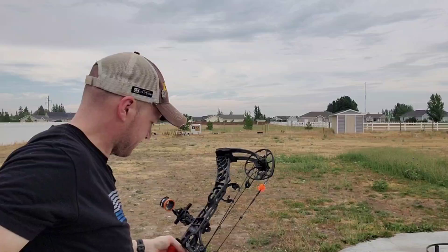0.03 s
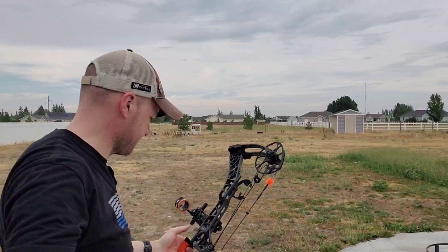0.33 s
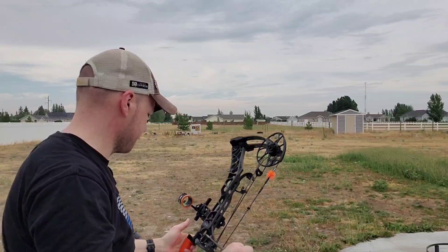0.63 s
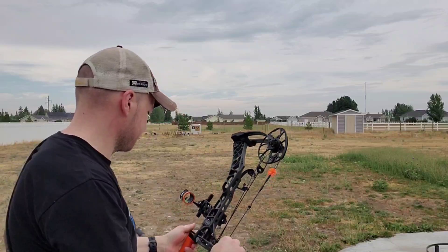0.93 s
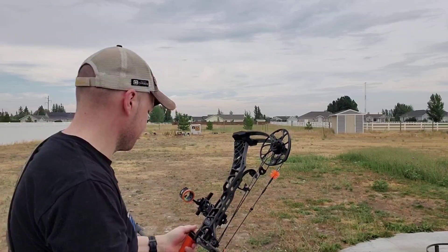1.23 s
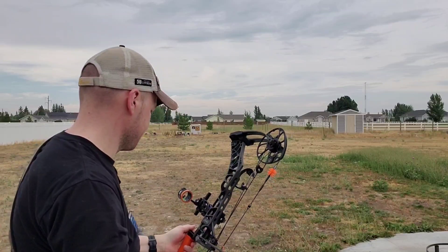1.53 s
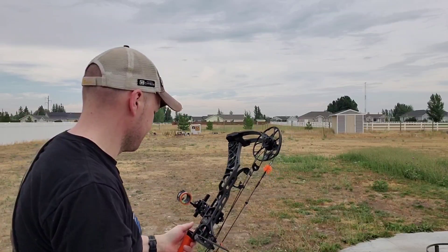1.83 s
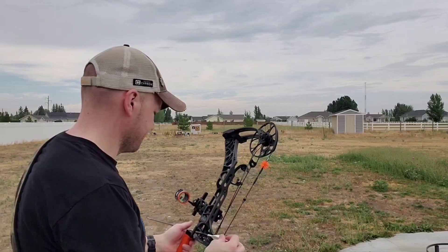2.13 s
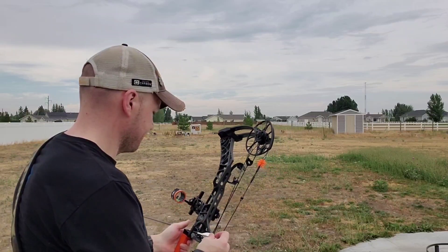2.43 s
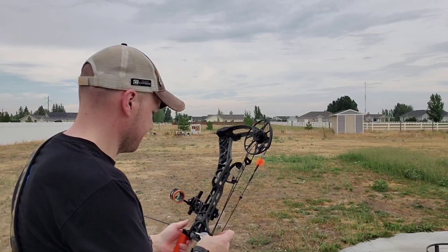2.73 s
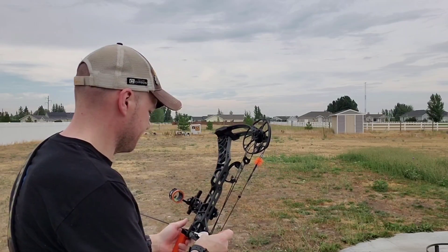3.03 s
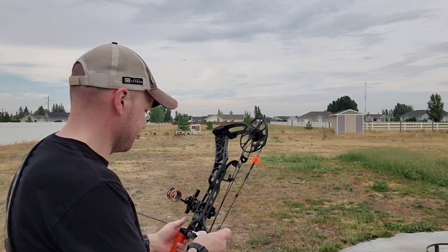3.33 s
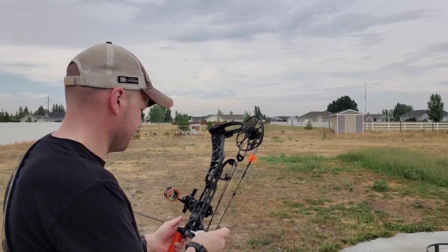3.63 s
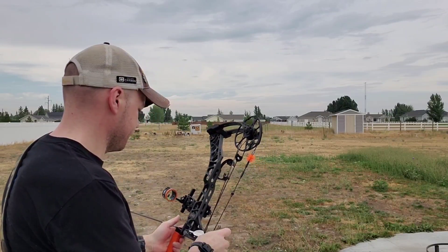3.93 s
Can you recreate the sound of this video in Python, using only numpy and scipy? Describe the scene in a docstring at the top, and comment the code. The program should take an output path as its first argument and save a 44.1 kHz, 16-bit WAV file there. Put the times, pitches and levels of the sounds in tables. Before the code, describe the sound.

About a metre from the microphone, beside an open field, a bow knocks and rattles lightly. An arrow is pulled free with a snap and scrape, and finally clicks onto the string, over faint wind rumble and a far engine.

```python
"""Beside an open field, a compound bow is readied about a metre from the microphone.
A hand knocks on the bow and a loose fitting tinkles. An arrow snaps out of the quiver, rasps through
its grip and brushes the rest in tiny stick-slips; then its nock clicks onto the string.
Each contact is a short crunch with ringing modes and a rattle. Behind it all: faint wind rumble,
far traffic, the drone of a distant engine and one thin whistle."""
import sys
import numpy as np
from scipy import signal
from scipy.fft import rfft, irfft
from scipy.io import wavfile
from scipy.ndimage import uniform_filter1d

SR = 44100
rng = np.random.default_rng(int(sys.argv[2]) if len(sys.argv) > 2 else 0)


def wrap_up_sound(samples):
    """Save the sound to the file named by the first command line argument, as 16-bit audio."""
    columns = np.atleast_2d(samples).T
    # keep every value between -1 and 1, then stretch to whole-number steps
    tamed = np.clip(columns, -1, 1)
    steps = np.round(tamed * 32767).astype(np.int16)
    wavfile.write(sys.argv[1], SR, steps)


N = 176400
TIME_S = np.arange(N) / SR
HIT_GAIN = np.sqrt(.004 * SR)  # gives a hit of energy 1 the energy of 4 ms at rms 1


def undb(db):
    """Decibels to gain."""
    return 10 ** (np.asarray(db) / 20)


def unit(x):
    """Scale to rms 1."""
    return x / np.sqrt(np.mean(x ** 2))


def energy(x):
    """Scale to energy 1 in each channel."""
    return x / np.sqrt(np.sum(x ** 2, axis=-1, keepdims=True))


def pan(x, left_db):
    """Make the left louder than the right."""
    return x * undb(np.array([[left_db], [-left_db]]) / 2)


def lag_right(x, lag_s):
    """Let a sound reach the right microphone later."""
    shift = np.exp(-2j * np.pi * np.arange(N // 2 + 1) * SR / N * lag_s)
    return np.array([x[0], irfft(rfft(x[1]) * shift, N)])


def colour(x, points, tilt_db=0, size=1024):
    """Causal EQ through (freq_hz, gain_db) points, tilted by tilt_db per octave above 1 kHz."""
    hz, db = np.array(points).T
    octave = np.log2(np.maximum(np.arange(size // 2 + 1), .5) * SR / size)
    curve_db = np.interp(octave, np.log2(hz), db) + tilt_db * np.maximum(octave - 10, 0)
    cepstrum = irfft(np.log(undb(curve_db)))
    cepstrum[1:size // 2] *= 2  # fold to minimum phase
    cepstrum[size // 2 + 1:] = 0
    impulse = irfft(np.exp(rfft(cepstrum)))
    return signal.fftconvolve(x, impulse[None], axes=1)[:, :x.shape[1]]


def drift(rate_hz):
    """Smooth random drift, spread near 1."""
    hold = int(SR / rate_hz)
    steps = np.repeat(rng.standard_normal(N // hold + 2), hold)
    return unit(uniform_filter1d(uniform_filter1d(steps, hold), hold))[:N]


def noise(side_db, size=N):
    """Stereo noise, wider as side_db rises."""
    mid, side = rng.standard_normal((2, size))
    return unit(mid + undb(side_db) * side * np.array([[1], [-1]]))


def fader(points):
    """Gain through (time_s, level_db) points, silent outside them."""
    return undb(np.interp(TIME_S, *np.array(points).T, left=-140, right=-140))


def add(out, start_s, x):
    """Mix a sound in at a time."""
    i = int(start_s * SR)
    out[:, i:i + x.shape[1]] += x[:, :N - i]


# Low rumble of the wind: freq_hz, gain_db
WIND_EQ = [(20, -19.5), (35, -14), (50, -5.5), (66, 1), (95, 5.5), (115, -4.5), (165, -10), (225, -7.5),
           (270, -20), (400, -34), (900, -62)]
def wind(level_db=-51):
    """Faint wind rumble, gently wavering."""
    rumble = unit(colour(noise(side_db=-13.5), WIND_EQ, size=8192))
    return pan(rumble * undb(level_db + .84 * drift(4.94)), left_db=1.3)


# Midrange wash of the traffic: freq_hz, gain_db
TRAFFIC_EQ = [(100, -2), (280, -1), (400, -3), (800, 3.5), (1100, 2), (1600, -7), (2300, -22), (4000, -27),
              (6500, -39), (9500, -36), (13000, -29.5), (15500, -33.5)]
def traffic(level_db=-62.5):
    """Far traffic lies to the left, so it reaches the right microphone later."""
    wash = unit(colour(lag_right(noise(side_db=-5), .00039), TRAFFIC_EQ, size=2048))
    return pan(wash * undb(level_db + .6 * drift(3)), left_db=4.4)


# Fader points of the engine: time_s
ENGINE_TIMES = [0, .9, 1.6, 2.0, 2.4, 3.1, 3.9]
# Tones of the engine: pitch_hz, level_db at each fader point
ENGINE_TONES = [(67.5, [-50, -62, -51.5, -52, -51, -52.5, -68]),
                (127.2, [-46.5, -52.5, -54.5, -53.5, -71, -73.5, -63.5]),
                (201, [-58.5, -77, -63, -60, -64, -67, -84.5]), (231, [-58, -63, -66, -82, -78, -57, -76])]
def engine():
    """Low wavering tones of a far engine, each swelling and fading."""
    drone = 0
    for pitch_hz, levels_db in ENGINE_TONES:
        phase = 2 * np.pi * np.cumsum(pitch_hz * (1 + .00564 * drift(4))) / SR
        swell_db = np.interp(TIME_S, ENGINE_TIMES, levels_db) + 2.44 * drift(7.85)
        drone += unit(np.sin(phase)) * undb(swell_db)
    return pan(drone, left_db=1.6)


# Glide of the whistle: time_s, pitch_hz, level_db
WHISTLE_GLIDE = [(0.335, 7800, -94), (0.355, 7660, -82), (0.385, 7560, -79), (0.42, 7900, -84),
                 (0.46, 8250, -92)]
def whistle():
    """One thin note far off, perhaps a bird, that dips and rises."""
    time_s, pitch_hz, level_db = np.array(WHISTLE_GLIDE).T
    glide_hz = np.interp(TIME_S, time_s, pitch_hz) * (1 + .0022 * drift(200))
    phase = 2 * np.pi * np.cumsum(glide_hz) / SR
    return unit(np.sin(phase)) * fader(np.column_stack([time_s, level_db]))


# Tone of the reflections: freq_hz, gain_db
SCATTER_EQ = [(200, 0), (3000, -13), (9000, -10), (15000, -4)]
def reflections(x, level_db=-17, t60_s=.48, size=26000):
    """Soft scatter from the ground and nearby walls."""
    t = np.arange(size) / SR
    tail = rng.standard_normal((2, size)) * undb(-60 * t / t60_s) * (1 - np.exp(-t / .008))
    tail = energy(colour(tail, SCATTER_EQ))
    return undb(level_db) * signal.fftconvolve(x, tail, axes=1)[:, :N]


# Swell of the sleeve against the body: time_s, level_db
SLEEVE_SWELL = [(0, -68), (.05, -68.5), (.1, -63.5), (.16, -55), (.22, -68), (.27, -69), (.33, -74.5),
                (.44, -73), (.56, -102)]
# Tone of the cloth: freq_hz, gain_db
SLEEVE_EQ = [(400, -11), (1500, 15.5), (3000, 0), (5500, -4), (8500, -2.5), (11500, -7), (15500, -7)]
def sleeve():
    """Soft cloth rustle as the arm comes round to the bow."""
    folds = undb(1.8 * drift(300))
    return unit(colour(noise(side_db=-1) * folds, SLEEVE_EQ)) * fader(SLEEVE_SWELL)


# Tone of the arrow shaft, rubbed or tapped: freq_hz, gain_db
SHAFT_EQ = [(300, -12), (900, -12.5), (1600, -5.5), (2900, 0), (4500, -7.5), (8000, -12.5), (11000, -16),
            (15500, -14)]
def stick_slip(resonances, slips_per_s, scatter_db, ring_db, tilt_db, judder_db, wander_db):
    """Tiny uneven slips and fine hiss excite the shaft; its resonances swell and fade as it slides."""
    slipping = rng.random(N) < slips_per_s / SR
    strength = undb(scatter_db * np.clip(rng.standard_normal(N), -2, 2))
    slips = unit(slipping * strength * rng.choice([-1, 1], N))
    force = (slips + noise(side_db=0)) * undb(judder_db * drift(220))
    body = 0
    for pitch_hz, width_hz, gain_db in resonances:
        band = signal.lfilter(*signal.iirpeak(pitch_hz, pitch_hz / width_hz, SR), force)
        body += band * undb(gain_db + ring_db + wander_db * drift(44.68))
    return unit(colour(force, SHAFT_EQ, tilt_db) + body)


# Swell of the brush: time_s, level_db
BRUSH_SWELL = [(1.89, -84), (1.955, -75.5), (2.0, -60.5), (2.04, -63), (2.058, -69.5), (2.11, -83)]
# Resonances of the shaft on the rest: pitch_hz, width_hz, gain_db
BRUSH_RESONANCES = [(2950, 200, -2), (3650, 260, 1), (4400, 280, 4), (5050, 200, -5), (8100, 700, -14)]
def rest_brush():
    """The shaft slides lightly over the arrow rest with a flickering hiss."""
    hiss = stick_slip(BRUSH_RESONANCES, slips_per_s=6500, scatter_db=5.5,
                      ring_db=2, tilt_db=-1.5, judder_db=.2, wander_db=7.5)
    return hiss * fader(BRUSH_SWELL)


# Swell of the rasp: time_s, level_db
RASP_SWELL = [(1.304, -58), (1.314, -47), (1.335, -43.5), (1.362, -49.5), (1.396, -49), (1.413, -46),
              (1.436, -49), (1.455, -52.5), (1.47, -52), (1.49, -52.5), (1.503, -66.5), (1.54, -70),
              (1.585, -101)]
# Resonances of the shaft in the grip: pitch_hz, width_hz, gain_db
RASP_RESONANCES = [(2070, 63, -5), (2216, 160, -2.5), (2900, 79, 3), (3600, 350, -2), (4320, 150, -4.5),
                   (5180, 100, -9), (6400, 500, -13.5), (8670, 250, -10)]
def quiver_rasp():
    """The shaft drags through the quiver's grip."""
    rasp = stick_slip(RASP_RESONANCES, slips_per_s=1500, scatter_db=1.5,
                      ring_db=2.5, tilt_db=.5, judder_db=.54, wander_db=1.5)
    return rasp * fader(RASP_SWELL)


def ringing(modes, size=8192):
    """Decaying modes of a struck part, slightly out of phase between left and right."""
    t, ring = np.arange(size) / SR, 0
    for pitch_hz, gain_db, t60_s in modes:
        cycles = pitch_hz * t + rng.random() + rng.random((2, 1)) / 6
        ring += undb(gain_db - 60 * t / t60_s) * np.sin(2 * np.pi * cycles) / np.sqrt(t60_s)
    return energy(ring)


def hit(eq, modes, contact_s, tilt_db, crack_db, ring_db, rattle_db, rattle_s, size=8192):
    """One contact: a short crunch, with a crack, a ring and a fading rattle mixed relative to it."""
    t = np.arange(size) / SR
    envelope = np.exp(-t / contact_s) * (1 - np.exp(-4 * t / contact_s))
    crunch = energy(noise(side_db=-7.5, size=size) * envelope)
    crack = undb(crack_db) * (t == 0)
    rattle = undb(rattle_db) * energy(noise(side_db=.5, size=size) * np.exp(-t / rattle_s))
    sound = energy(colour(crunch + crack + rattle, eq)) + undb(ring_db) * ringing(modes, size)
    return energy(colour(sound, [(20, 0), (20000, 0)], tilt_db)) * HIT_GAIN


# Knocks on the bow: start_s, level_db, contact_s, tilt_db_per_octave
BOW_KNOCKS = [(0.0461, -51.5, 0.0054, -9), (0.1204, -44.5, 0.0013, -1.5), (0.1446, -41.5, 0.008, -6),
              (0.1495, -46.5, 0.0049, -1), (0.1714, -43, 0.0056, -1.5), (0.1743, -37.5, 0.0093, 0.5),
              (0.1804, -40.5, 0.001, 4.5), (0.19, -50, 0.0024, 3), (0.2171, -50.5, 0.0014, -4.5),
              (0.2881, -53.5, 0.0024, -1), (0.333, -61, 0.0036, -3.5), (0.392, -51, 0.0071, -4.5),
              (0.402, -53.5, 0.0046, -6)]
# Tone of a knock: freq_hz, gain_db
KNOCK_EQ = [(120, 3), (300, 5), (700, 5.5), (1100, 2), (1550, 5.5), (2800, -7), (4400, -4), (7000, -9),
            (11000, -17.5), (15500, -18)]
# Ring of the bow: pitch_hz, gain_db, t60_s
BOW_MODES = [(295, 0, .12), (850, -3, .04), (1480, -3, .035), (2300, -7, .025), (3700, -5, .03),
             (4450, -3, .035), (6950, -3, .02), (9150, -3, .025)]
def bow_knocks():
    """Hand and fittings knock on the bow and set it ringing."""
    out = np.zeros((2, N))
    for start_s, level_db, contact_s, tilt_db in BOW_KNOCKS:
        knock = hit(KNOCK_EQ, BOW_MODES, contact_s, tilt_db,
                    crack_db=-14, ring_db=-6, rattle_db=-5, rattle_s=.012)
        add(out, start_s, undb(level_db) * knock)
    return out


# Bounces of the fitting: start_s, level_db
FITTING_BOUNCES = [(0.1825, -44), (0.2015, -55), (0.2315, -60)]
# Ring of the fitting: pitch_hz, gain_db, t60_s
FITTING_MODES = [(4400, 0, .045), (4620, -1, .05), (3720, -8, .035)]
def fitting_tinkles():
    """A loose metal fitting rings in fading bounces after the hardest knock."""
    out = np.zeros((2, N))
    for start_s, level_db in FITTING_BOUNCES:
        add(out, start_s, undb(level_db) * ringing(FITTING_MODES) * HIT_GAIN)
    return out


# Taps of the shaft: start_s, level_db
SHAFT_TAPS = [(1.1676, -65.5), (1.681, -69), (1.903, -63.5), (1.913, -62.5), (2.036, -60), (3.6354, -71)]
def shaft_taps():
    """Light, dull taps of the shaft ring the bow."""
    out = np.zeros((2, N))
    for start_s, level_db in SHAFT_TAPS:
        tap = hit(SHAFT_EQ, BOW_MODES, contact_s=.0032, tilt_db=-5.5,
                  crack_db=-10, ring_db=-6, rattle_db=-3, rattle_s=.01)
        add(out, start_s, undb(level_db) * tap)
    return out


# Snaps of the quiver: start_s, level_db, tilt_db_per_octave
QUIVER_SNAPS = [(1.305, -35, -1.5), (1.3093, -47, -3), (1.3174, -43, -6), (1.3221, -45, 1),
                (1.3305, -48, -4), (1.3383, -56, -1), (1.402, -49, -7), (1.407, -52, -4.5),
                (1.4153, -45.5, -3), (1.43, -50, -4), (1.4821, -49.5, -3.5)]
# Tone of a snap: freq_hz, gain_db
SNAP_EQ = [(300, -24), (700, -16), (1200, -10.5), (1900, -13), (3000, -0.5), (5500, -2), (8000, 1),
           (12000, -2), (15500, -4)]
# Ring of the quiver: pitch_hz, gain_db, t60_s
QUIVER_MODES = [(2980, -1, .1), (4530, -9.5, 0.039), (6840, 1.5, 0.029), (8000, -1, 0.016),
                (9800, -1.5, 0.015), (11250, -10, 0.022)]
def quiver_snaps():
    """The arrow snaps free of the quiver and catches as it slides."""
    out = np.zeros((2, N))
    for start_s, level_db, tilt_db in QUIVER_SNAPS:
        snap = hit(SNAP_EQ, QUIVER_MODES, contact_s=.0009, tilt_db=tilt_db,
                   crack_db=-2, ring_db=-5, rattle_db=-3, rattle_s=.007)
        add(out, start_s, undb(level_db) * snap)
    return out


# The nock's click and its bounces: start_s, level_db
NOCK_CLICKS = [(3.9107, -44.5), (3.9154, -45), (3.9208, -45)]
# Tone of a click: freq_hz, gain_db
NOCK_EQ = [(300, -10), (850, -1), (2000, -4), (2800, -1.5), (3600, 0.5), (5200, -1.5), (6600, -0.5),
           (9500, 0), (13500, -7), (15500, -7)]
# Ring of the nock: pitch_hz, gain_db, t60_s
NOCK_MODES = [(860, -9, .06), (3461, 2, .09), (6455, -4, .06), (8640, 0, .05), (9109, -2, .055),
              (11100, -4, .06)]
def nock_clicks():
    """Three quick plastic clicks as the nock seats on the string, each thinner than the last."""
    out = np.zeros((2, N))
    for bounce, (start_s, level_db) in enumerate(NOCK_CLICKS):
        click = hit(NOCK_EQ, NOCK_MODES, contact_s=.00084, tilt_db=1.4 * bounce,
                    crack_db=-7, ring_db=-10, rattle_db=-3, rattle_s=.012)
        add(out, start_s, undb(level_db) * click)
    return out


# The right microphone is shaded from the bow's treble: freq_hz, gain_db
SHADE_EQ = [(1000, 1.5), (8500, -1.5), (11000, -3), (13000, -1.5), (15500, -14)]
def scene():
    """The bow and arrow close by and a little to the left, the open field behind."""
    rubs = quiver_rasp() + rest_brush()
    contacts = bow_knocks() + quiver_snaps() + shaft_taps() + fitting_tinkles()
    handling = lag_right(rubs + contacts + sleeve(), lag_s=.00009)
    left, right = pan(handling + nock_clicks(), left_db=3)
    bow = np.vstack([left, colour(right[None], SHADE_EQ)])
    return bow + reflections(bow) + engine() + whistle() + wind() + traffic()


def record(dry, top_hz=15900):
    """A steep low-pass trims the very top."""
    return signal.sosfilt(signal.ellip(10, .2, 70, top_hz, fs=SR, output="sos"), dry)


dry = scene()
out = record(dry)
wrap_up_sound(out)
```